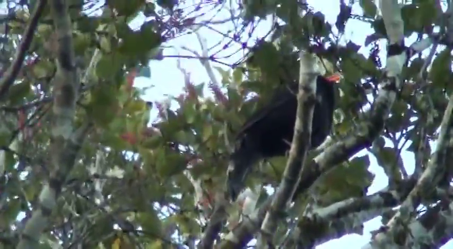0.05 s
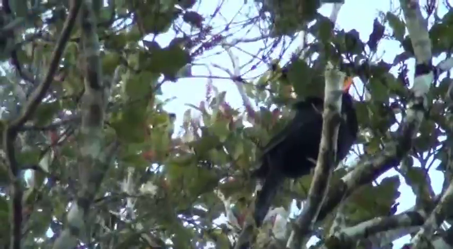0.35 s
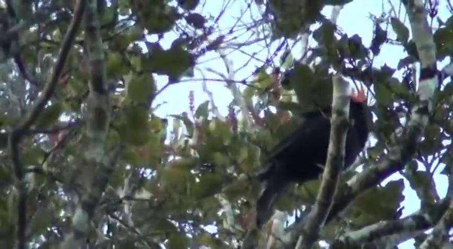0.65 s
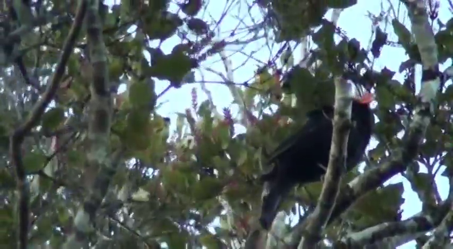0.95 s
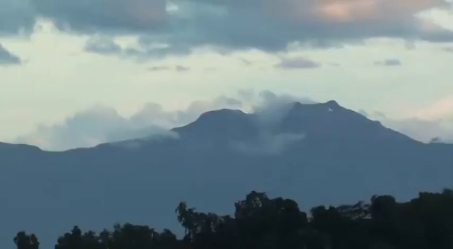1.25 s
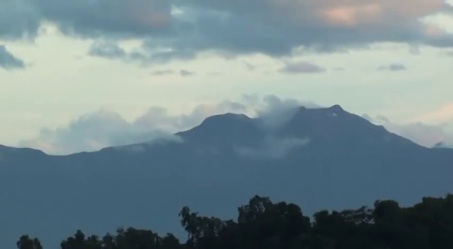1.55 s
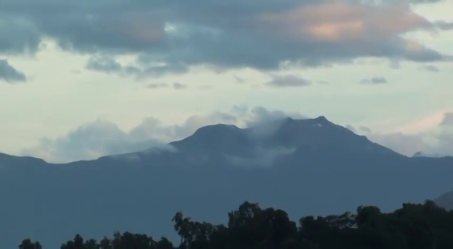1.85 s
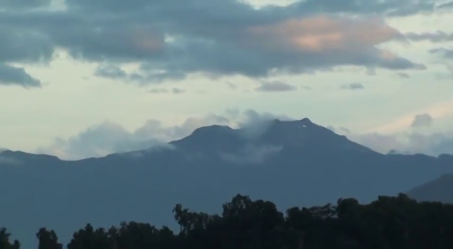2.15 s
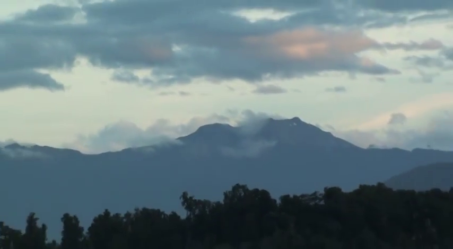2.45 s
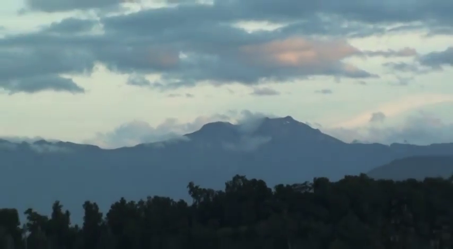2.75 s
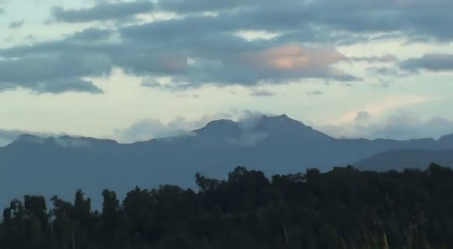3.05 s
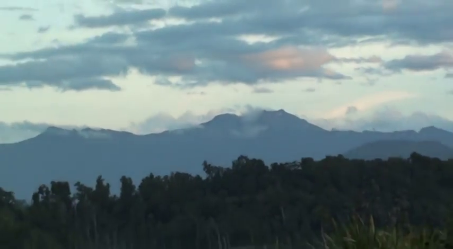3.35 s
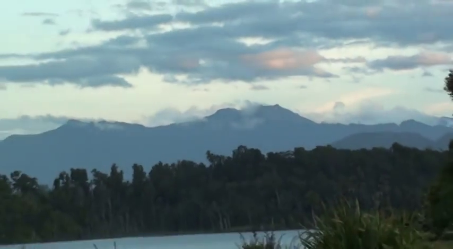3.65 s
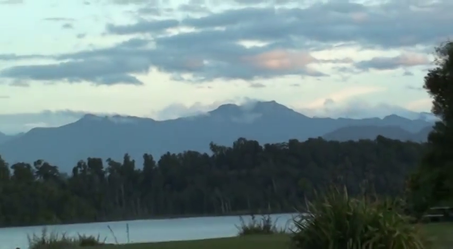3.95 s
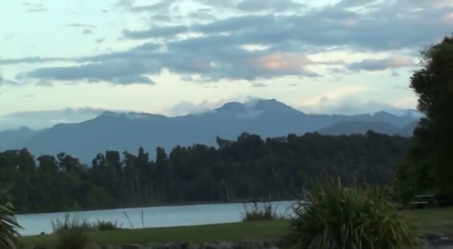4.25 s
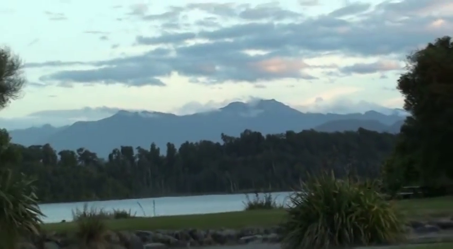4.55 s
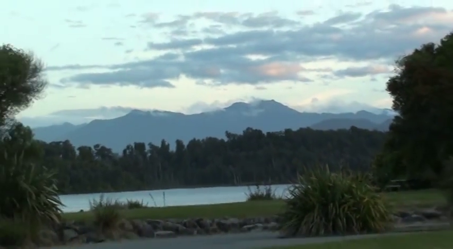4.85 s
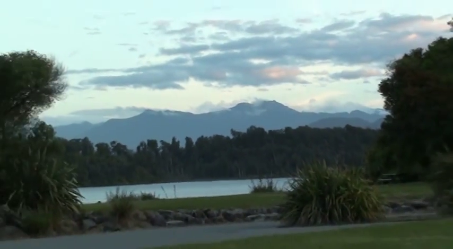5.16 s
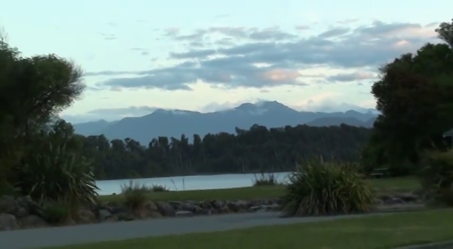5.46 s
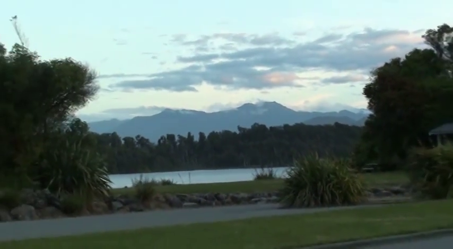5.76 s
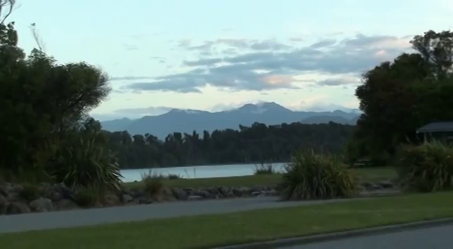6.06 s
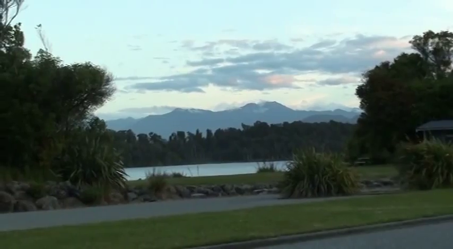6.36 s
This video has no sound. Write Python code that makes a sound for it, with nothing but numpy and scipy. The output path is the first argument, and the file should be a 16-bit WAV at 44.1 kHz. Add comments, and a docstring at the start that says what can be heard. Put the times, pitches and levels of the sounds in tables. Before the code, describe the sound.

One brief phrase from a nearby songbird opens: a gentle slur, a raspy warble, then two clear ringing notes. After a sudden change to a calm lake shore, only faint, far birdsong remains, with scattered whistles, two nasal calls and quick chirps echoing lightly off the trees. Soft airy hiss and a slight hum lie underneath. At the close come a low handling rumble and three light clicks right at the microphone.

```python
"""Bellbird, then a lakeside

A bellbird sings in a tree close to the microphone: slurred whistles, a buzzing trill, then two bell
notes from both sides of its syrinx. The scene cuts to a quiet lakeside, where distant birds whistle
and chip over the hush of open air and a faint hum. Near the end, right at the microphone, the hand
on the camera makes three small clicks and a low rumble."""
import sys
import numpy as np
from scipy import signal
from scipy.io import wavfile
from scipy.ndimage import uniform_filter1d

SR = 44100
rng = np.random.default_rng(int(sys.argv[2]) if len(sys.argv) > 2 else 0)


def log_audio(samples):
    """Write samples as a 16-bit WAV file to the path given in sys.argv[1]."""
    # one column per channel
    frames = np.atleast_2d(samples).T
    # limit to full scale, then quantise
    limited = np.clip(frames, -1, 1)
    pcm = np.round(limited * 32767).astype(np.int16)
    wavfile.write(sys.argv[1], SR, pcm)


N = 291221
TIME = np.arange(N) / SR

# spectrum of the open air at each place: frequency_hz, relative_density_db
TREE_AIR = [(30, -18.5), (90, -0.5), (270, 1.5), (550, 0), (850, -1), (1300, -4.5), (4000, -7.5),
            (9000, -17), (15500, -18)]
LAKE_AIR = [(18, -46), (30, -13), (66, -16), (97, -2), (284, -3), (410, -2), (945, -6), (1590, -4.5),
            (2020, -11.5), (3600, -11.7), (8500, -20), (15500, -21.5)]
# how alike the air sounds on the left and right: frequency_hz, correlation
AIR_LIKENESS = [(70, 1), (250, 0.75), (1200, 0.42), (5000, 0.74)]
# bands of the hum: centre_hz, width_hz, level_db
HUM_BANDS = [(88.5, 12.5, -64), (182, 15, -70.5)]
# bands of the far chorus: centre_hz, width_hz, relative_db
CHORUS_BANDS = [(3600, 370, -78), (4070, 435, -73), (6040, 1300, -69)]
# its rise and fall: time_s, gain_db
CHORUS_SWELL = [(1.3, -3), (4.5, 10.5), (5.9, 8), (6.6, -0.5)]

# rumble of the hand: time_s, level_db
HAND_RUMBLE = [(5.5, -92), (5.9, -57), (6.3, -70.5), (6.44, -52.5), (6.6, -54)]
# taps on the camera: start_s, strength_db, contact_cutoff_hz
CAMERA_TAPS = [(6.2095, -24, 900), (6.3265, -33, 9000), (6.527, -31.5, 6000)]
# modes of its shell: frequency_hz, relative_db
SHELL_MODES = [(1000, -7), (1950, -4.5), (3200, -6), (4100, -1.5), (5800, -4)]

# pitch tremble by kind of whistling voice: voice, share_of_pitch
VOICE_TREMBLE = {"clear": .01, "husky": .026, "hoarse": .05}
# distant whistles; the crest lies swell_db above the ends, at crest_share of the length:
# start_s, length_s, first_hz, middle_hz, last_hz, crest_db, swell_db, crest_share, voice
FAR_WHISTLES = [(1.650, .09, 2050, 1927, 1754, -52.5, 5, 0.4, "hoarse"),
                (1.805, 0.087, 3450, 3735, 3800, -48, 14, 0.46, "husky"),
                (1.895, 0.34, 5540, 5500, 5500, -57, 6, .2, "clear"),
                (2.025, 0.18, 2750, 2345, 2425, -38, 9, 0.41, "hoarse"),
                (2.175, 0.086, 2467, 2635, 2490, -36.5, 12, 0.089, "husky"),
                (2.315, 0.31, 1813, 1856, 2007, -38, 10.5, 0.89, "clear"),
                (2.805, 0.14, 2060, 2280, 1750, -29, 16, 0.76, "clear"),
                (2.78, 0.087, 3850, 4300, 4640, -54, 6, 0.5, "clear"),
                (3.257, 0.088, 1593, 2013, 1644, -41.5, 5, 0.5, "clear"),
                (3.26, 0.095, 2140, 2750, 2250, -55.5, -5, 0.5, "clear"),
                (3.562, 0.2, 2495, 2323, 2135, -35.5, 10, 0.87, "husky"),
                (3.555, 0.1, 3400, 3626, 3770, -46.5, 3, 0.53, "husky"),
                (3.830, .059, 2590, 4860, 2600, -42, 1.5, 0.079, "clear"),
                (4.130, 0.155, 3110, 3560, 3460, -42.5, 4, 0.94, "hoarse"),
                (5.110, 0.083, 2406, 2413, 2300, -47.5, 5, 0.46, "clear"),
                (5.365, 0.081, 3370, 3800, 3860, -48, 4, 0.94, "clear"),
                (6.125, 0.1, 2394, 2460, 2230, -46, 5.5, 0.62, "clear")]
# their harmonics, from the first: relative_db
WHISTLE_HARMONICS_DB = [0, -25.5]
# distant falling slurs: start_s, first_hz, crest_db
FALLS = [(3.359, 3130, -39.5), (3.437, 3340, -37), (3.518, 3510, -37.5)]
# distant reedy calls: start_s, length_s, scoop_s, pitch_hz, overshoot_hz, slide_hz_per_s,
# closing_bend_hz, second_harmonic_db, third_harmonic_db, accent_db
REEDY_CALLS = [(4.265, 0.13, 0.0064, 1358, 16.7, -900, -19, -37, -59, -0.5),
               (4.493, .522, .034, 1331, 85, -275, 43, -45, -47.5, 7)]
# their harmonics four to six: relative_db
REEDY_UPPER_DB = [-8.5, -7.5, -10]
# distant chips: start_s, length_s, first_hz, middle_hz, last_hz, crest_db
CHIPS = [(5.21, .026, 4660, 7600, 6200, -48), (5.248, 0.012, 3280, 6000, 5600, -40.5),
         (5.273, 0.011, 2900, 4920, 4900, -41), (5.3, 0.014, 2950, 4260, 3000, -43),
         (5.303, .011, 3900, 5250, 4200, -48), (5.328, .012, 3670, 4600, 3800, -40)]
# thin notes of other birds in the tree: columns as FAR_WHISTLES
NEIGHBOURS = [(0, 0.064, 5630, 5600, 5620, -34, 18, 0.031, "hoarse"),
              (0, 0.094, 3520, 3530, 3690, -38.5, 8.3, 0.031, "hoarse")]

# the bellbird's soft first note: columns as FAR_WHISTLES
FIRST_NOTE = [(.121, 0.033, 1760, 2000, 1890, -34.5, 7, 0.97, "clear")]
# the slur after it: time_s, pitch_hz, level_db
SLUR_CURVE = [(0.156, 1600, -40.5), (0.184, 1775, -32), (0.202, 1500, -34.5), (0.216, 1918, -28),
              (0.238, 1867, -22), (0.25, 1820, -32), (0.266, 1773, -19), (0.296, 1734, -35.5),
              (0.338, 1698, -26.5)]
# harmonics of the slur and of the trill's low voice, from the first: relative_db
SLUR_HARMONICS_DB = [0, -30, -26, -32, -46, -26, -44, -25]
TRILL_HARMONICS_DB = [4.5, -27, -20.5, -42, -29, -30]
# bell notes: start_s, length_s, release_s, high_voice_entry_s
BELL_NOTES = [(0.669, 0.187, 0.01, .008), (.908, 0.17, 0.011, 0.0026)]
# the two voices, one curve per bell note: time_s, low_hz, high_hz, low_db, high_db
BELL_VOICES = [
    [(0.672, 2895, 2990, -15, -22), (0.684, 2867, 3110, -9, -16.5), (0.7, 2716, 3150, -12.5, -24.5),
     (0.72, 2652, 3080, -9.5, -16), (0.746, 2623, 3156, -7, -13.5), (0.757, 2610, 3120, -12, -25),
     (0.77, 2577, 3095, -11, -12), (0.792, 2645, 3057, -12, -15.5), (0.811, 2638, 3170, -8, -15.5),
     (0.834, 2555, 3135, -21, -25)],
    [(0.91, 2746, 3214, -16.5, -15.5), (0.935, 2714, 3195, -20, -16), (0.948, 2640, 3135, -7.5, -17.5),
     (0.974, 2604, 3104, -13.5, -22), (1.005, 2602, 3074, -16.5, -12.5), (1.04, 2564, 3047, -14, -25),
     (1.062, 2560, 3000, -10, -20)],
]
# overtones of the two coupled voices: low_multiple, high_multiple, relative_db
TRILL_COMBINATIONS = [(-1, 2, -14), (1, 1, -16), (2, 1, -19), (1, 2, -14)]
BELL_COMBINATIONS = [(-1, 2, -18), (2, -1, -29), (2, 0, -26), (1, 1, -17), (0, 2, -25), (-1, 3, -29),
                     (3, 0, -24), (2, 1, -25), (1, 2, -32), (0, 3, -40), (2, 2, -46), (1, 3, -45),
                     (5, 0, -46), (3, 2, -42)]


def from_db(db):
    """Decibels to amplitude."""
    return 10 ** (np.asarray(db) / 20)


def unit_rms(x):
    """The signal scaled to rms 1."""
    return x / np.sqrt(np.mean(x ** 2) + 1e-20)


def at_hz(points, hz):
    """A curve's value at one frequency, on a log axis."""
    frequencies, values = np.transpose(points)
    return np.interp(np.log(hz), np.log(frequencies), values)


def gain_curve(rows):
    """Amplitude at every sample from rows of time_s, level_db."""
    return from_db(np.interp(TIME, *np.transpose(rows)))


def gliding(rows, at):
    """The columns of a curve, smoothly joined, at the given samples."""
    times, *columns = np.transpose(rows)
    return [uniform_filter1d(np.interp(at / SR, times, column), size=220) for column in columns]


def drift(rate_hz, size):
    """Random wander with a spread of roughly 1."""
    knots = rng.standard_normal(int(2 * rate_hz * size / SR) + 2)
    return np.interp(np.arange(size) * 2 * rate_hz / SR, np.arange(len(knots)), knots)


def noise_band(hz, width_hz):
    """Noise in one band, rms 1."""
    sos = signal.butter(2, [max(hz - width_hz / 2, 10), hz + width_hz / 2], "band", fs=SR, output="sos")
    return unit_rms(signal.sosfilt(sos, rng.standard_normal(N)))


def note(start_s, length_s, attack_s=0.00057, release_s=0.0028):
    """Sample indices of a note, the time since its start, and its soft gate."""
    at = np.arange(max(int(start_s * SR), 0), min(int((start_s + length_s) * SR), N))
    t = (at - at[0]) / SR
    ramp = np.clip(np.minimum(t / attack_s, (t[-1] - t) / release_s), 0, 1)
    return at, t, np.sin(np.pi / 2 * ramp) ** 2


def phase_of(hz, jitter):
    """Phase of a membrane whose pitch trembles slightly."""
    return 2 * np.pi * np.cumsum(hz * (1 + jitter * drift(250, len(hz)))) / SR


def harmonics(phase, levels_db, first=1):
    """Successive harmonics of one voice."""
    return sum(from_db(db) * np.sin(k * phase) for k, db in enumerate(levels_db, first))


def coupled(low, high, tones, flutter_db=3):
    """Sum and difference tones of two voices; each wavers in strength on its own."""
    return sum(from_db(db + flutter_db * drift(35, len(low))) * np.sin(m * low + n * high)
               for m, n, db in tones)


def whistles(notes, harmonics_db=(0,)):
    """Single-voiced notes: near sines that each glide along one arc."""
    out = np.zeros(N)
    for start_s, length_s, first_hz, middle_hz, last_hz, crest_db, swell_db, crest_share, voice in notes:
        at, t, gate = note(start_s, length_s)
        progress = t / t[-1]
        arch_hz = (2 * middle_hz - first_hz - last_hz) * 2 * progress * (1 - progress)
        hz = first_hz + (last_hz - first_hz) * progress + arch_hz
        db = crest_db - swell_db * np.interp(progress, [0, crest_share, 1], [1, 0, 1])
        out[at] += gate * from_db(db) * harmonics(phase_of(hz, VOICE_TREMBLE[voice]), harmonics_db)
    return out


def woods(x, early_db, tail_db, tail_t60_s, width, left_db, right_lag_s, early_t60_s=0.09):
    """Direct sound at the microphone, a quick scatter off near trunks, a tail from the trees beyond."""
    t = TIME[:SR]
    scatter = 0
    for db, t60_s, per_s in ((early_db, early_t60_s, 900), (tail_db, tail_t60_s, 5000)):
        echoes = rng.standard_normal((3, SR)) * (rng.random((3, SR)) < per_s / SR)
        echoes *= from_db(-60 * t / t60_s) * (1 - np.exp(-10 * t / t60_s))   # build up, then die away
        echoes = echoes[:2] * width + echoes[2]   # each side's own, plus a shared set
        scatter += from_db(db) * echoes / np.linalg.norm(echoes, axis=1, keepdims=True)
    direct = np.array([x, np.interp(TIME - right_lag_s, TIME, x)])
    reflected = signal.fftconvolve(x[None], scatter, axes=1)[:, :N]
    return (direct + reflected) * from_db([[left_db / 2], [-left_db / 2]])


def open_air(spectrum, level_db, waver_db, recording_mono_above_hz=8600):
    out, edges = 0, 22 * 2 ** (np.arange(20) / 2)   # half-octave bands
    white = rng.standard_normal((2, 2, N))
    for k, (low, high) in enumerate(zip(edges, edges[1:])):
        band = signal.butter(2, [low, high], "band", fs=SR, output="sos")
        mid, side = signal.sosfilt(band, white[k % 2])
        hz = np.sqrt(low * high)
        alike = at_hz(AIR_LIKENESS, hz) if hz < recording_mono_above_hz else 1
        gain = from_db(at_hz(spectrum, hz) + waver_db * drift(2.7, N))
        out += gain * (np.sqrt(1 + alike) * mid + np.sqrt(1 - alike) * side * [[1], [-1]])
    return from_db(level_db) * unit_rms(out)


def hum():
    """A faint low hum: two narrow bands of noise about an octave apart."""
    return sum(from_db(db) * noise_band(hz, width_hz) for hz, width_hz, db in HUM_BANDS)


def far_chorus(per_s=70):
    """Many far birds blur into a bed of hiss with a faint random twitter in it."""
    twitter = []
    for when, band, pitch, length, glide, loudness in rng.random((int(per_s * N / SR), 6)):
        centre_hz, width_hz, _ = CHORUS_BANDS[int(band * len(CHORUS_BANDS))]
        start_s, length_s = when * (N / SR - .1), .022 + .04 * length
        hz, glide_hz = centre_hz + width_hz * (pitch - .5), width_hz * (glide - .5)
        db = -68 + 6 * (loudness - .5)
        twitter.append((start_s, length_s, hz, hz + glide_hz / 2, hz + glide_hz, db, 6, .5, "clear"))
    bed = sum(from_db(db - 1) * noise_band(hz, width_hz) for hz, width_hz, db in CHORUS_BANDS)
    return gain_curve(CHORUS_SWELL) * (bed + whistles(twitter))


def hand_on_camera(shell_t60_s=0.012):
    """At the microphone the hand rumbles and taps ring the camera's shell; a soft contact is duller."""
    taps, t = np.zeros(N), TIME[:SR // 20]
    for start_s, db, cutoff_hz in CAMERA_TAPS:
        modes = sum(from_db(mode_db) * np.sin(2 * np.pi * hz * t) * rng.choice([-1, 1])
                    for hz, mode_db in SHELL_MODES)
        ring = modes * from_db(-60 * t / shell_t60_s)
        tap = signal.sosfilt(signal.butter(1, cutoff_hz, fs=SR, output="sos"), ring)
        start = int(start_s * SR)
        taps[start:start + len(t)] += from_db(db) * tap[:N - start]
    return taps + gain_curve(HAND_RUMBLE) * noise_band(70, 46)


def far_falls(length_s=0.062, octaves_per_s=10, swell_db=4):
    """A distant bird repeats a steep downward slur, a little higher each time."""
    drop = 2 ** (-octaves_per_s * length_s)
    notes = [(start_s, length_s, hz, hz * np.sqrt(drop), hz * drop, db, swell_db, .5, "husky")
             for start_s, hz, db in FALLS]
    return whistles(notes, WHISTLE_HARMONICS_DB)


def far_reedy_calls(settle_s=0.029, brighten_db=19):
    """A call scoops up, sags, and brightens as it closes; the throat filters out its fundamental."""
    out = np.zeros(N)
    for (start_s, length_s, scoop_s, pitch_hz, overshoot_hz, slide_hz_per_s,
         bend_hz, second_db, third_db, accent_db) in REEDY_CALLS:
        at, t, gate = note(start_s, length_s, attack_s=scoop_s, release_s=0.034)
        scoop = np.clip(1 - t / scoop_s, 0, 1)
        accent = np.exp(-((t - scoop_s) / settle_s) ** 2)
        closing = np.exp(-((length_s - t) / settle_s) ** 2)
        hz = pitch_hz + overshoot_hz * (accent - scoop) + slide_hz_per_s * t + bend_hz * closing
        levels_db = [second_db - brighten_db * closing, third_db + brighten_db * closing]
        levels_db += [third_db - 3 + db for db in REEDY_UPPER_DB]
        voice = harmonics(phase_of(hz, jitter=0.0085), levels_db, first=2)
        out[at] += gate * from_db(accent_db * accent) * voice
    return out


def far_chips(swell_db=4, crest_share=0.31):
    """Each distant chip sweeps steeply up and sags again."""
    return whistles([(*chip, swell_db, crest_share, "clear") for chip in CHIPS])


def bellbird_slurs():
    """Soft opening notes, with a rasp of air in the throat that fades as the slur settles."""
    out = whistles(FIRST_NOTE, SLUR_HARMONICS_DB)
    start_s, end_s = SLUR_CURVE[0][0], SLUR_CURVE[-1][0]
    at, t, gate = note(start_s, end_s - start_s + .004)
    hz, db = gliding(SLUR_CURVE, at)
    rasp_shape = np.hanning(len(at) * 5 // 4)[-len(at):]
    rasp = from_db(db.max() - 25) * rasp_shape * noise_band(2750, 1200)[at]
    voice = np.sqrt(2) * from_db(db) * harmonics(phase_of(hz, jitter=0.013), SLUR_HARMONICS_DB)
    out[at] += gate * (voice + rasp)
    return out


def bellbird_trill(surge_s=0.494, warble_hz=63.8, warble_crest_s=0.5365, throat_hz=6200):
    """Two voices start together; the low one surges into a fast, raspy warble as the high one fades."""
    out = np.zeros(N)
    at, t, gate = note(start_s=0.428, length_s=0.2, attack_s=0.032, release_s=0.058)
    since_surge_s = at / SR - surge_s
    effort = .5 + .5 * np.tanh(since_surge_s / 0.0144)
    warble_phase = 2 * np.pi * warble_hz * (at / SR - warble_crest_s)
    warble = (0.44 + 0.56 * effort) * (np.cos(warble_phase) + .25 * np.cos(2 * warble_phase))
    low_hz = 1981 + 650 * t + 190 * effort + 165 * warble
    high_hz = 2770 + 1700 * t + 253 * effort ** 2
    low_phase = phase_of(low_hz, jitter=0.011 * (2 - effort))
    high_phase = phase_of(high_hz, jitter=0.02 * (1 + 2 * effort))
    # overtones gain up to 6 dB as they sweep through the throat's resonance
    levels_db = [db + 6 / (1 + ((k * low_hz - throat_hz) / 350) ** 2)
                 for k, db in enumerate(TRILL_HARMONICS_DB, 1)]
    low_voice = harmonics(low_phase, levels_db)
    high_gain = from_db(-6 - 22 * np.tanh(np.maximum(since_surge_s, 0) / 0.042))
    high_voice = high_gain * (np.sin(high_phase) + coupled(low_phase, high_phase, TRILL_COMBINATIONS))
    rasp = from_db(-29) * noise_band(5000, 5000)[at]
    swell = from_db(-25.5 + 19.5 * t + 5.5 * effort)
    out[at] = gate * swell * (low_voice + high_voice + rasp)
    return out


def bellbird_bells(jitter=0.0046):
    """Both sides of the syrinx sound at once and modulate each other into sum and difference tones."""
    out = np.zeros(N)
    rasp = from_db(-31) * noise_band(6800, 2600)
    breath = from_db(-40) * noise_band(8000, 11000)
    for (start_s, length_s, release_s, entry_s), curve in zip(BELL_NOTES, BELL_VOICES):
        at, t, gate = note(start_s, length_s, attack_s=0.006, release_s=release_s)
        low_hz, high_hz, low_db, high_db = gliding(curve, at)
        low_phase, high_phase = phase_of(low_hz, jitter), phase_of(high_hz, 1.58 * jitter)
        low_gain, high_gain = from_db(low_db), from_db(high_db)
        high_entry = np.clip(t / entry_s, 0, 1)
        voices = low_gain * np.sin(low_phase) + high_gain * high_entry * np.sin(high_phase)
        # the coupling builds up after the attack and lets go before the end
        _, _, coupling_gate = note(start_s, length_s, attack_s=0.023, release_s=0.031)
        coupling = coupling_gate * uniform_filter1d(np.sqrt(low_gain * high_gain), size=1500)
        overtones = coupled(low_phase, high_phase, BELL_COMBINATIONS)
        out[at] += gate * (voices + coupling * (overtones + rasp[at] + breath[at]))
    return out


def lakeside():
    """On the shore: birds far off to the left, hush and hum, and the hand on the camera."""
    song = whistles(FAR_WHISTLES, WHISTLE_HARMONICS_DB) + far_falls() + far_reedy_calls() + far_chips()
    flutter = from_db(3 * drift(40, N))   # the far voices waver in strength
    birds = woods(song * flutter, early_db=-6, tail_db=-9.5, tail_t60_s=0.85,
                  width=0.56, left_db=8.5, right_lag_s=-50e-6)
    return (birds + hum() + hand_on_camera() + far_chorus()
            + open_air(LAKE_AIR, level_db=-48.5, waver_db=-0.5))


def tree():
    """At the tree: the bellbird close by, a little to the left, with faint neighbours."""
    song = bellbird_slurs() + bellbird_trill() + bellbird_bells() + whistles(NEIGHBOURS)
    birds = woods(song, early_db=-8.5, tail_db=-17, tail_t60_s=0.51,
                  width=0.44, left_db=3, right_lag_s=6e-6)
    return birds + open_air(TREE_AIR, level_db=-42.5, waver_db=1)


def scene(cut_s=1.257):
    """The tree gives way abruptly to the lakeside."""
    return np.where(TIME < cut_s, tree(), lakeside())


def record(dry, cutoff_hz=15900):
    """The very top of the treble is cut steeply."""
    return signal.sosfilt(signal.ellip(12, .1, 80, cutoff_hz, fs=SR, output="sos"), dry)


dry = scene()
out = record(dry)
log_audio(out)
```